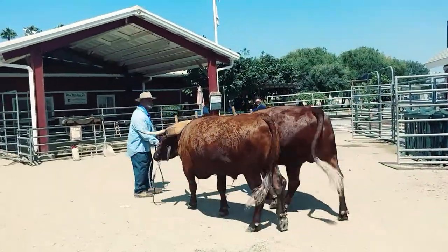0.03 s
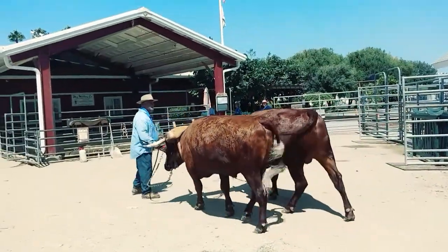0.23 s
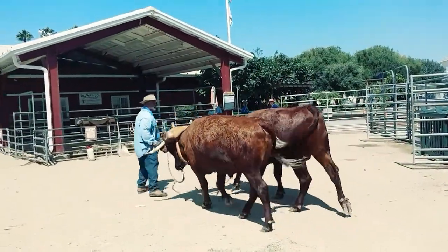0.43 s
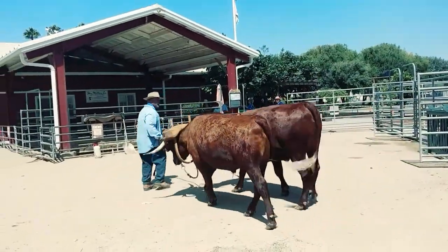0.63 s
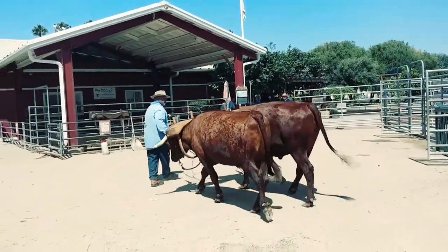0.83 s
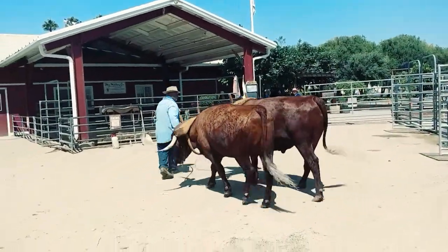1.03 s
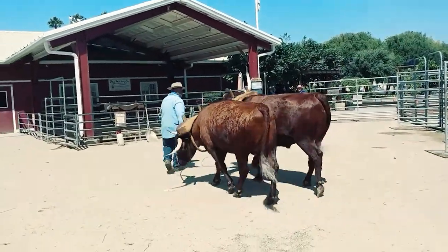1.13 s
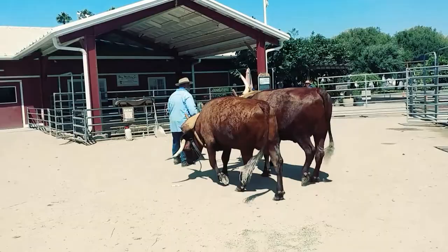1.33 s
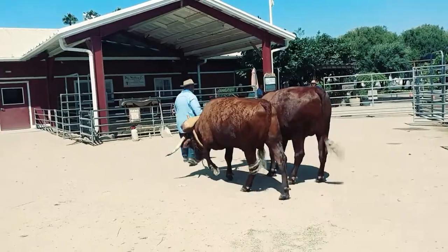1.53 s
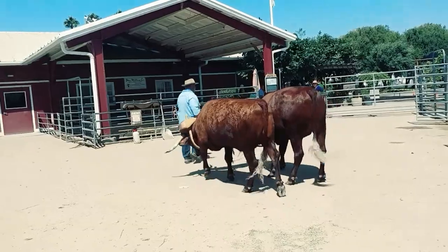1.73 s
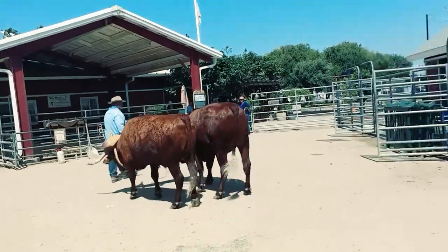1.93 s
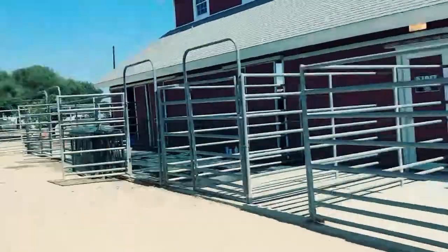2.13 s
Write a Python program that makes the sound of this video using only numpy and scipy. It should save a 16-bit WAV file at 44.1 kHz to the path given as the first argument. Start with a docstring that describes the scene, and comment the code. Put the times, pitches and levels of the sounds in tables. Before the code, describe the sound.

One long cow moo swells, then drops in pitch, with faint hoof steps on sand.

```python
"""A closed-mouth hum, off to the left in an open farmyard, opens into one long buzzy moo, then sags
and turns rough. The cow's vocal folds pulse through her throat and mouth, and the hard ground returns
every pulse a moment later. Cattle walk on gritty sand and a hoof thuds on packed earth. The right
microphone is shaded; barns and pens send back dull echoes, and a distant low rumble lies underneath."""
import sys
import numpy as np
from scipy import signal
from scipy.fft import rfft, irfft
from scipy.io import wavfile
from scipy.ndimage import uniform_filter1d, map_coordinates

SR = 44100
rng = np.random.default_rng(int(sys.argv[2]) if len(sys.argv) > 2 else 0)


def persist_wave(psi):
    """Save psi, clipped to +-1, as 16-bit WAV."""
    counts = np.round(np.clip(psi, -1, 1) * 32767).astype(np.int16)
    wavfile.write(sys.argv[1], SR, np.atleast_2d(counts).T)


N = 97020
T = np.arange(N) / SR
FFT_SIZE = 2 ** 17
HZ = np.maximum(np.arange(FFT_SIZE // 2 + 1) * SR / FFT_SIZE, 1)


# effort behind the call: (time [s], relative level [dB])
CALL_EFFORT = [(0, -30.5), (.2, -18), (.35, -13.5), (.84, -3.5), (1.16, 1), (1.46, -2.5), (1.56, -9)]

def moo():
    """One cow calls: a low hum first, a bellow while the mouth is open, and the hum lingers a little."""
    effort_db, = in_time(CALL_EFFORT)
    voice = throat_and_mouth(vocal_folds())
    hum = filtered(voice, below(hz=950))
    hum_gain = from_db(-28 + 0.9 * effort_db) * (1 - step(1.544, over_s=0.036))
    mouth_open = step(0.34, over_s=0.036) * (1 - step(1.519, over_s=0.018))
    bellow_gain = from_db(-26.5 + effort_db) * mouth_open
    return hum_gain * hum + bellow_gain * (voice - hum)


# pulse rate of the folds: (time [s], pitch [Hz])
FOLD_PITCH = [(.07, 91.94), (.2, 99.9), (.39, 107.8), (.62, 111.2), (.78, 116.2), (.865, 119.7),
              (.96, 126.8), (1.14, 133.6), (1.33, 129.7), (1.395, 123.5), (1.455, 114.1), (1.51, 99.2)]

def vocal_folds():
    """Pulses give way to hoarse air in the treble; the voice breaks up as the pitch sags."""
    harmonics, hoarse_hz, sag_hz_per_s = 120, 5070, 190
    jitter, shimmer_db, skew_rad = 0.017, 0.5, 2.17
    roughness = 0.13 + step(1.488, over_s=0.021)
    sag_hz = sag_hz_per_s * np.clip(T - FOLD_PITCH[-1][0], 0, .15)
    pitch = uniform_filter1d(in_time(FOLD_PITCH)[0], size=1500) - sag_hz
    phase = 2 * np.pi * np.cumsum(pitch * (1 + jitter * roughness * drift(rate_hz=87))) / SR
    # the folds open slowly and shut fast, which skews each pulse
    pulses = sum(np.cos(k * phase - skew_rad * np.exp(-k / 2.9)) for k in range(1, harmonics + 1))
    puffs = rms_one((1 + np.cos(phase)) ** 2 + 2)
    air = np.sqrt(harmonics) * rng.standard_normal(N) * puffs
    shimmer = from_db(shimmer_db * roughness * drift(rate_hz=190))
    voiced = filtered(pulses * shimmer, 1 / np.sqrt(1 + (HZ / hoarse_hz) ** 4))
    breath = from_db(-9) * roughness * air
    hoarseness = from_db(1) * filtered(air, 1 - below(hoarse_hz))
    return voiced + breath + hoarseness


# mouth half open: (frequency [Hz], gain [dB])
MOUTH_HALF_OPEN = [(110, -13), (218, 1.5), (238, 8.5), (300, 0), (460, 5.5), (880, -14.5), (1100, -7),
                   (1310, 6), (1600, -10.5), (1780, -0.5), (2150, -0.5), (2330, -13.5), (2700, 7.5),
                   (2980, -21.5), (3400, -0.5), (3650, -20.5), (4500, -24.5), (4850, -40), (5200, -22.5),
                   (5600, -43), (15000, -53)]
# tone of the wide-open moo in the yard, where a wall echo dips the third harmonic near 400 Hz:
# (frequency [Hz], gain [dB])
WIDE_MOO_IN_YARD = [(110, -22), (170, -4.5), (260, 5), (383, 7.5), (400, -19), (425, -3), (665, -1),
                    (900, 0), (1060, -7), (1210, 3.5), (1420, -7.5), (1600, 6.5), (1800, -13), (2080, 4),
                    (2300, -10.5), (2580, -3.5), (3200, -1), (3450, -16.5), (3950, -7.5), (4300, -27),
                    (4600, -19.5), (4850, -41), (5200, -29.5), (6500, -43), (8000, -37), (10000, -48),
                    (11500, -41.5), (15000, -74)]
# the resonances glide as the jaw moves: (time [s], frequency ratio [1])
JAW_GLIDE = [(.3, 1.005), (.68, .985), (1, 1), (1.45, 1.005)]

def throat_and_mouth(source):
    """Resonances shape the voice as the mouth widens; as it narrows at the end, one rings out."""
    ratio, = in_time(JAW_GLIDE)
    half_open = gliding(source, causal(MOUTH_HALF_OPEN), ratio)
    wide_open = gliding(source, causal(WIDE_MOO_IN_YARD), ratio)
    widened = step(0.93, over_s=0.15)
    voice = (1 - widened) * half_open + widened * wide_open
    # the upper resonances come in after the mouth has opened
    treble = filtered(voice, 1 - below(hz=3050))
    voice = voice - (1 - step(0.49, over_s=0.043)) * treble
    ringing = filtered(voice, resonance(hz=2534, width_hz=62))
    return voice + from_db(7.5) * step(1.434, over_s=0.021) * ringing


def off_the_ground(x):
    """Direct sound, shaded by the body, plus a ground bounce whose path lengthens as the head moves."""
    direct_share, delay_ms = 0.48, 1.297 + 0.19 * T
    bounce = map_coordinates(x, [np.arange(N) - delay_ms * SR / 1000])
    return direct_share * x + bounce


# hoof strikes: (time [s], level [dB])
HOOF_STRIKES = [(0.405, -7.5), (0.427, -17), (0.559, -17.5)]
# modes of a hoof on packed earth: (frequency [Hz], relative level [dB], T60 [s])
EARTH_MODES = [(181.7, -5, 0.082), (790, -28, 0.14)]

def hoof_thuds():
    """Hooves set the packed earth of the yard ringing briefly."""
    out = np.zeros(N)
    for s, db in HOOF_STRIKES:
        age = np.maximum(T - s, 0)
        for hz, mode_db, t60 in EARTH_MODES:
            out += from_db(db + mode_db) * np.sin(2 * np.pi * hz * age) * from_db(-60 * age / t60)
    return out


# steps on sand, and at 1.606 s the cow's last puff of breath after the moo:
# (time [s], grit level [dB], push level [dB], decay [s])
STEPS_AND_PUFF = [(0.107, -48, -46, 0.05), (0.341, -44.5, -35, 0.03), (0.414, -63, -29, 0.048),
                  (0.557, -50.5, -30, 0.03), (0.641, -45, -56, 0.038), (.915, -44.5, -65, 0.13),
                  (1.273, -38, -46, 0.029), (1.554, -42.5, -34.5, 0.033), (1.606, -71, -32, 0.018),
                  (1.943, -56.5, -38.5, 0.0091), (2.144, -40.5, -44, 0.024)]
# crunch of the grains: (frequency [Hz], relative level [dB])
GRIT_SPECTRUM = [(1000, -7.5), (3000, 1.5), (6000, 1), (9000, 7), (11000, -8.5), (13500, -8), (15000, -40)]
# dull push of hoof or breath: (frequency [Hz], relative level [dB])
PUSH_SPECTRUM = [(150, 3.5), (600, -2), (1200, -3.5), (2400, -7.5), (4000, -19.5), (9000, -48)]

def scuffs_and_puff():
    """Sand grains crunch underfoot over a dull push; the puff of breath is almost all push."""
    grains_per_s, spread_db, attack_share = 3000, 4, 0.26
    grains = (rng.random(N) < grains_per_s / SR) * rng.choice([-1, 1], N)
    strengths = from_db(spread_db * np.minimum(rng.exponential(1, N), 4))
    grit = rms_one(filtered(grains * strengths, causal(GRIT_SPECTRUM)))
    push = noise(causal(PUSH_SPECTRUM))
    return sum(burst(s, attack_share * decay, decay) * (from_db(grit_db) * grit + from_db(push_db) * push)
               for s, grit_db, push_db, decay in STEPS_AND_PUFF)


# snaps of a pebble: (time [s], level [dB])
PEBBLE_SNAPS = [(2.152, -24), (2.1558, -25)]

def pebble_crack():
    """A pebble cracks underfoot with two bright snaps."""
    snap = noise(band(hz=7000, width_hz=3900) + 0.19 * below(hz=15500))
    return snap * sum(from_db(db) * burst(s, attack_s=0.00027, decay_s=0.0012) for s, db in PEBBLE_SNAPS)


# high rings among the steps: (time [s], frequency [Hz], level [dB], decay [s])
STEP_RINGS = [(0.097, 15400, -45, 0.055), (.63, 15400, -35, 0.043), (0.638, 11060, -46.5, 0.087),
              (1.18, 5790, -41.5, 0.11), (0.418, 5830, -54, .19), (1.967, 11300, -54.5, 0.054)]

def thin_rings():
    """Narrow bands of noise ring thinly with some steps."""
    return sum(noise(band(hz, width_hz=430)) * from_db(db) * burst(s, attack_s=0.003, decay_s=decay)
               for s, hz, db, decay in STEP_RINGS)


# shade at the right microphone: (frequency [Hz], right minus left [dB])
RIGHT_MIC_SHADE = [(60, -9), (200, -1.5), (380, -6), (700, -16.5), (1290, -14.5), (2000, -23), (2600, -56),
                   (4400, -18), (8000, -66), (15000, -37)]

def from_the_left(x):
    """The left microphone hears the cattle in full, slightly late; the right is shaded, most in treble."""
    left_lag_ms = 0.28
    left = filtered(x, np.exp(-2j * np.pi * HZ * left_lag_ms / 1000))
    right = filtered(x, from_db(in_hz(RIGHT_MIC_SHADE)[0]))
    return np.array([left, right])


def yard_echoes(x):
    """Barns and pens scatter dull echoes, different at each microphone and louder on the left."""
    t60_s, delay_s, dull_hz, left_db, right_db = 0.27, 0.0074, 1530, -6, -19
    tail = rng.standard_normal((2, N)) * from_db(-60 * T / t60_s) * (T > delay_s)
    tail /= np.sqrt(np.sum(tail ** 2, axis=1, keepdims=True))
    dull = filtered(x, 1 / (1 + 1j * HZ / dull_hz))
    return signal.fftconvolve(dull[None], tail, axes=1)[:, :N] * from_db([[left_db], [right_db]])


# open air: (frequency [Hz], relative level [dB], right minus left [dB], left-right likeness [0-1])
OPEN_AIR = [(25, -49, 18, 0.63), (33.7, -24, 4, 0.74), (54.7, -0.5, 4, 1), (80, 0, -16.5, 0.61),
            (104.3, -5.5, 7, 1), (173, -8, -12, 0.94), (405, -18, -5.5, 0), (900, -25, -12.5, 0.31),
            (1530, -34.5, -12.5, 0), (7000, -48.5, -6.5, 0), (9300, -45, -15, 0), (11200, -58, -1, 0),
            (15300, -58, -4, 0.11)]

def distant_rumble():
    """Far-off rumble reaches both microphones under a faint diffuse hiss; the two swell and ease once."""
    db, right_db, alike = in_hz(OPEN_AIR)
    mid, side = rng.standard_normal((2, N))
    shared, apart = np.sqrt(1 + alike), np.sqrt(np.maximum(1 - alike, 0))
    left_gain, right_gain = from_db(db), from_db(db + right_db)
    left = filtered(mid, left_gain * shared) + filtered(side, left_gain * apart)
    right = filtered(mid, right_gain * shared) - 0.87 * filtered(side, right_gain * apart)
    level_db = -41.5 + 7 * np.exp(-(T - 0.88) ** 2)
    return rms_one(np.array([left, right])) * from_db(level_db)


def from_db(db):
    return 10 ** (np.asarray(db) / 20)


def rms_one(x):
    return x / np.sqrt(np.mean(x ** 2) + 1e-20)


def in_time(rows):
    """Each column of a curve, sample by sample."""
    s, *columns = np.transpose(rows)
    return [np.interp(T, s, c) for c in columns]


def in_hz(rows):
    """Each column of a spectrum, bin by bin."""
    hz, *columns = np.transpose(rows)
    return [np.interp(np.log(HZ), np.log(hz), c) for c in columns]


def filtered(x, response):
    return irfft(rfft(x, FFT_SIZE) * response, FFT_SIZE)[..., :N]


def causal(rows):
    """Minimum-phase response with the outline (frequency [Hz], gain [dB])."""
    cepstrum = irfft(np.log(from_db(in_hz(rows)[0])))
    cepstrum[1:FFT_SIZE // 2] *= 2
    cepstrum[FFT_SIZE // 2 + 1:] = 0
    return np.exp(rfft(cepstrum))


def gliding(x, response, ratio):
    """A filter whose resonances all move by the given frequency ratio."""
    samples, clock = np.arange(N), np.cumsum(ratio)
    stretched = map_coordinates(x, [np.interp(samples, clock, samples)])
    return map_coordinates(filtered(stretched, response), [clock])


def below(hz):
    """Steep low-pass response."""
    return 1 / (1 + (HZ / hz) ** 8)


def band(hz, width_hz):
    return 1 / (1 + (2 * (HZ - hz) / width_hz) ** 4)


def resonance(hz, width_hz):
    """One ringing resonance with gain 1 at its peak."""
    return 1 / (1 + 2j * (HZ - hz) / width_hz)


def noise(response):
    return rms_one(filtered(rng.standard_normal(N), response))


def drift(rate_hz):
    """Random wander with spread 1."""
    return noise(1 / (1 + (HZ / rate_hz) ** 2))


def burst(s, attack_s, decay_s):
    """Envelope that peaks at s."""
    return np.exp(-np.maximum((s - T) / attack_s, (T - s) / decay_s))


def step(s, over_s):
    """Smooth rise from 0 to 1 around s."""
    return .5 + .5 * np.tanh((T - s) / (2 * over_s))


def scene():
    """Cattle to the left of the microphones, the yard around them, rumble in the distance."""
    cattle = off_the_ground(moo()) + hoof_thuds() + scuffs_and_puff() + pebble_crack() + thin_rings()
    return from_the_left(cattle) + yard_echoes(cattle) + distant_rumble()


def record(dry):
    """Both channels lose the very top of the treble in a steep cut."""
    cutoff_hz = 15900
    return filtered(dry, 1 / np.sqrt(1 + (HZ / cutoff_hz) ** 200))


dry = scene()
out = record(dry)
persist_wave(out)
```